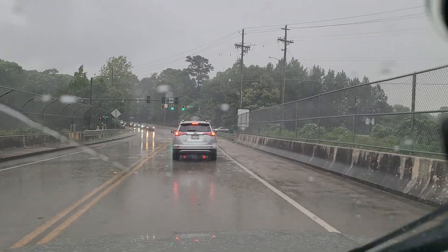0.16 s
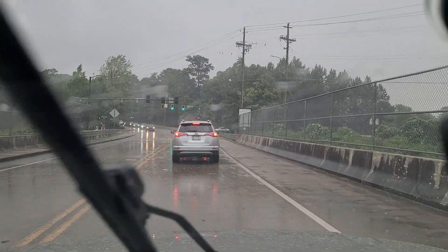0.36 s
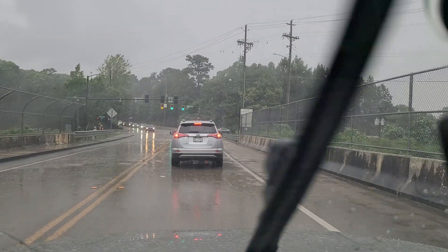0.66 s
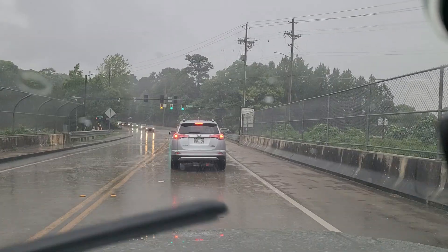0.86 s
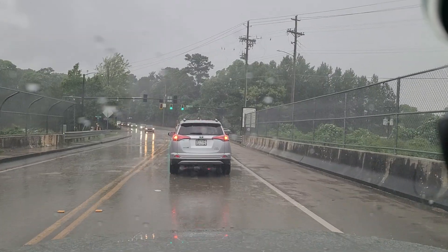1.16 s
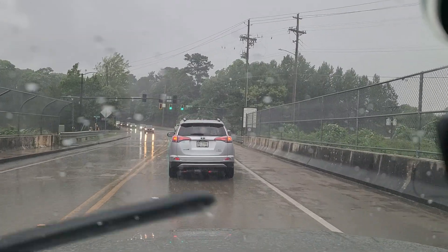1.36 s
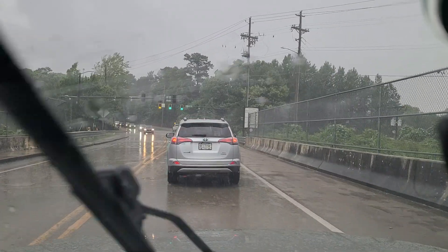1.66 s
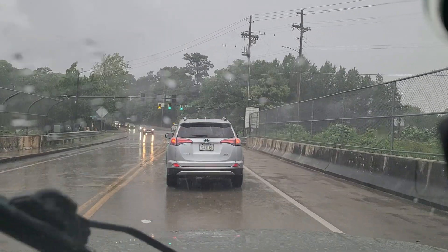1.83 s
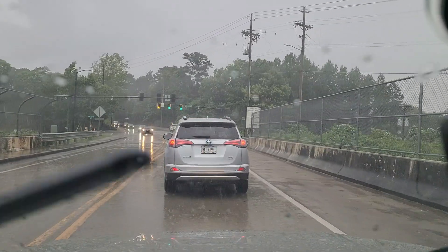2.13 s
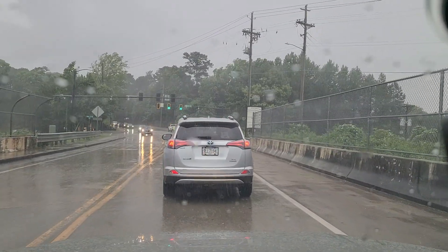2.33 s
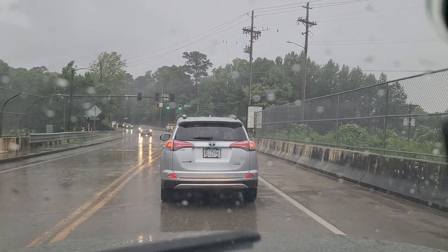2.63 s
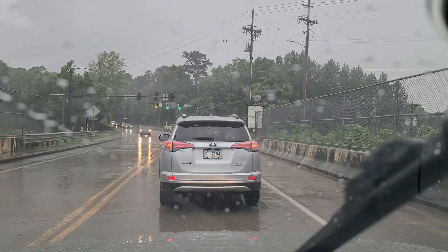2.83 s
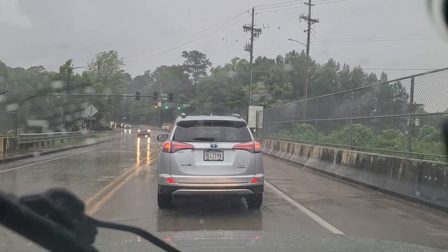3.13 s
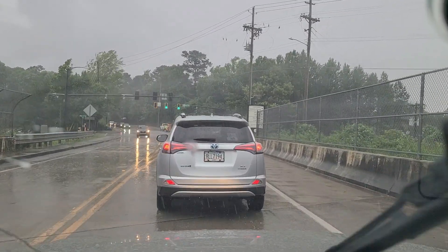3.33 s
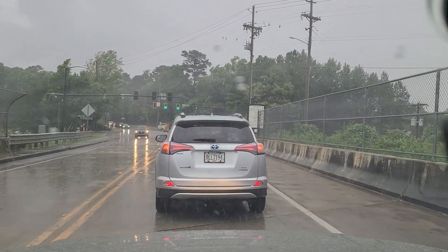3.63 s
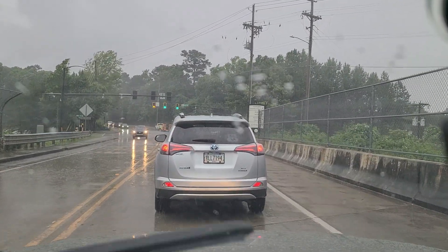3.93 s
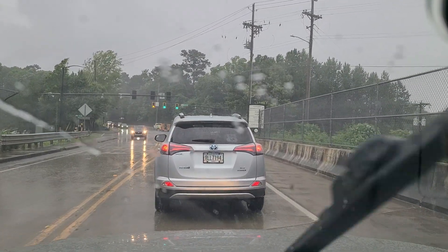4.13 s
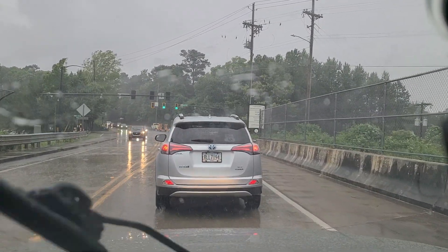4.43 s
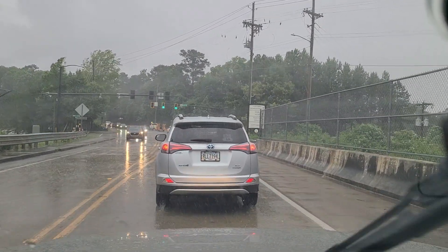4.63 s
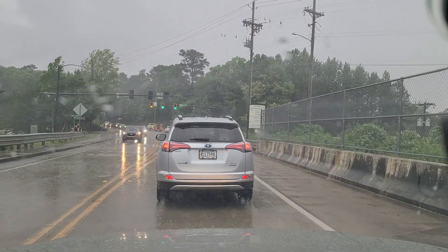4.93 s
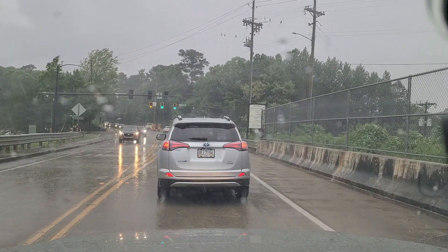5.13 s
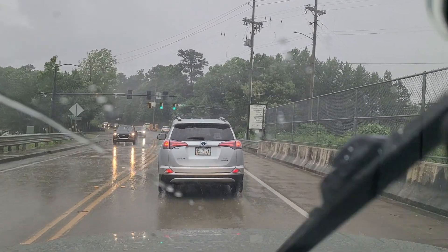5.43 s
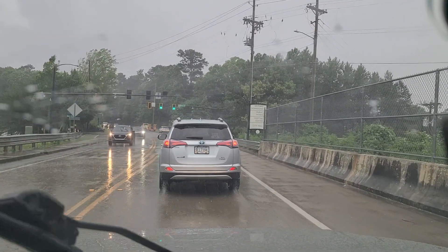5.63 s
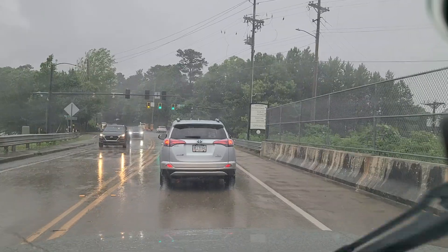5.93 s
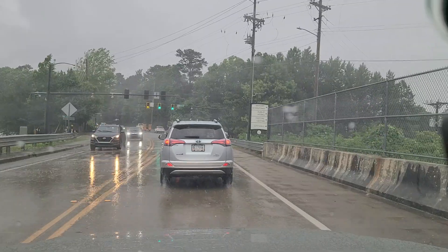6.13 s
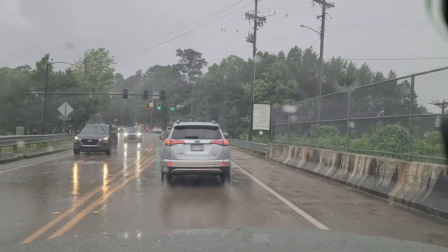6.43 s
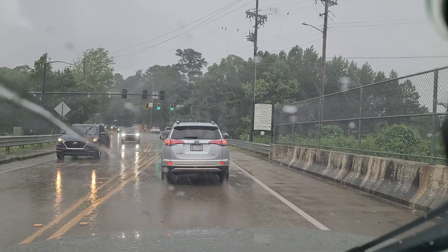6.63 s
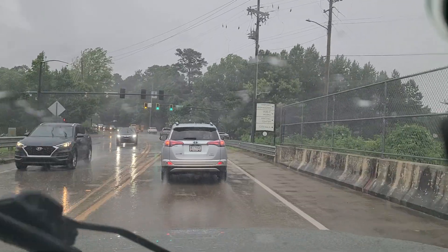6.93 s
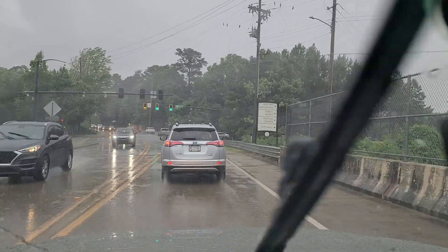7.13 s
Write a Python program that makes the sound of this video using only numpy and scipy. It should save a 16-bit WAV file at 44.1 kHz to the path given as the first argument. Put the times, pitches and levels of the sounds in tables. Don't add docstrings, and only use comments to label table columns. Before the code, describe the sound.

Rain patters over a car cabin while rubber wiper blades knock back and forth, small ticks sound, and a low engine hum rises near the end.

```python
import sys
import numpy as np
from scipy import signal
from scipy.fft import rfft, irfft, next_fast_len
from scipy.io import wavfile
from scipy.ndimage import uniform_filter1d

SR = 44100
rng = np.random.default_rng(int(sys.argv[2]) if len(sys.argv) > 2 else 0)


def transcribe(u):
    v = np.clip(np.atleast_2d(u).T, -1, 1)
    q = np.round(v * 32767).astype(np.int16)
    wavfile.write(sys.argv[1], SR, q)


def magnitude_from_level(level_db):
    exponent = np.asarray(level_db, float) / 20
    return 10 ** exponent


N = 321489
SIZE = next_fast_len(N + 4096)
BINS_HZ = np.maximum(np.arange(SIZE // 2 + 1) * SR / SIZE, 1)

# time_s, firing_hz, effort_db
ENGINE_RUN = [(0, 32.8, -24), (.8, 27.53, -42.5), (1.9, 25.37, -33.5), (2.75, 29.25, -44),
              (3.2, 32.17, -32.5), (3.4, 31.3, -36.5), (4.6, 25.93, -42.5), (5.15, 29.2, -40),
              (5.34, 31.85, -35.5), (5.48, 36.63, -19.5), (5.57, 45.6, -21), (5.72, 43.8, -18.5),
              (5.95, 44.65, -20), (6.13, 50.06, -19.5), (6.19, 51.72, -23), (6.4, 55, -18.5),
              (6.62, 61, -19), (7.0, 66.5, -16)]
# multiple, level_db
FIRING_HARMONICS = [
    (1, -1),
    (2, -8),
    (3, -16.5),
    (4, -24.5),
]
# pitch_hz, gain_db
CABIN_TRANSFER = [(44, 8), (50, 1.5), (52, -9), (62, -16.5), (88, 2), (112, -28.5), (133, -5.5), (160, -1),
                  (195, -2), (228, -3), (250, 11.5), (260, -10)]
# time_s, level_db
TYRE_ROAR = [(0, -29), (.8, -33), (1.6, -33), (2.6, -35.5), (3.6, -37), (4.6, -38), (5.2, -36.5),
             (6.2, -31), (6.7, -31.5), (7.29, -31.5)]
# peak_s, seat_boom_db, floor_boom_db
ROAD_BUMPS = [(0.039, -25, -12.5), (0.088, -15, -16.5), (.29, -36, -20), (.41, -20.5, -38),
              (0.509, -16, -16.5), (.62, -21, -31), (.72, -21, -25), (.93, -35, -22), (1.052, -24, -40),
              (1.118, -38, -15.5), (1.35, -23, -21), (1.6, -41, -22), (1.94, -42, -25), (2.09, -32, -26),
              (2.47, -29, -21), (2.55, -29, -43), (2.71, -22.5, -39), (2.84, -42, -23), (3.19, -41, -28.5),
              (3.48, -23, -39.5), (3.82, -42, -21.5), (4.36, -43, -25.5), (4.54, -43, -26.5),
              (4.68, -30, -27.5), (5.05, -38, -30.5), (6.7, -47, -23), (7.2, -18, -41)]
# pitch_hz, density_db_per_hz
SEAT_SPECTRUM = [(20, 5), (30, 21), (37, 22.5), (48, 9), (62, 9.5)]
# pitch_hz, density_db_per_hz
FLOOR_SPECTRUM = [(52, 0.5), (59, -7), (67, -2.5), (77, 8), (83, 10), (89, -23), (98, -6), (112, -15.5)]

# time_s, downpour_db, spray_db
RAINFALL = [(0, 2.5, 4.5), (.3, 3.5, 4.5), (.75, 3, 2.5), (.97, 0, 2.5), (1.32, -1, 1.5), (1.76, 2.5, 2),
            (2.31, 2, 0.5), (2.84, -2, -5), (3.1, -1.5, -7.5), (3.53, -4.5, 0), (3.72, -5, 0),
            (3.98, 0, -2), (4.5, -3, -5.5), (4.65, 1.2, -3), (5.1, -2, -5), (5.9, -2, -2.5), (6.6, 2, 1),
            (7.25, 3.5, 5.5)]
# pitch_hz, density_db_per_hz
ROOF_DRUMMING = [(360, -3.5), (620, 1), (654, -5), (749, -5), (1150, -2), (1200, 2), (1260, -2),
                 (1480, -7.5), (1950, -8.5), (2960, -14.5), (3800, -36.5), (4940, -48), (8360, -120)]
# pitch_hz, density_db_per_hz
GLASS_PATTER = [(1880, -13), (3200, -1.5), (3770, -8), (5120, -13.5), (7300, -14.5), (8090, -20.5),
                (8800, -35.5), (11400, -57), (19400, -120)]
# pitch_hz, density_db_per_hz
SPRAY_FIZZ = [(5470, -40), (8700, -7.5), (9500, 0), (10100, 2), (12300, 0.5), (13700, -1.5), (15600, -11)]
# peak_s, level_db
MIST_PUFFS = [(.3, -74), (.75, -68), (2.171, -69), (2.69, -76), (3.37, -77), (3.51, -65), (3.78, -72),
              (4.63, -73), (7.15, -69)]
# pitch_hz, shared_fraction
EAR_LIKENESS = [(30, 1), (80, .97), (130, 0.78), (290, 0.83), (600, 0.21), (1200, 0.29), (2400, 0.11),
                (5000, 0.096), (15000, 0.15)]
# pitch_hz, left_minus_right_db
EAR_BALANCE = [(60, 1.5), (110, -3.5), (200, 0.5), (380, -3.5), (700, -1.5), (1290, -1), (2380, -1.5),
               (4400, -4), (8120, 1), (15000, -8.5)]

# pitch_hz, density_db_per_hz
DASH_SPECTRUM = [(59, -33), (100, 6.5), (113, 0), (140, 3.5), (199, -5), (240, -9.5), (310, -14.5),
                 (530, -120)]
# pitch_hz, density_db_per_hz
ROOF_SPECTRUM = [(215, -16.5), (240, -2.5), (257, 0.5), (275, -5), (310, -31)]
# pitch_hz, density_db_per_hz
WET_SCREEN_SPECTRUM = [(160, -14), (270, 0.5), (376, -4), (567, -7), (650, -26), (720, -5), (940, -29),
                       (1580, -120)]
# turn_s, dash_knock_db, roof_hum_db
BOTTOM_TURNS = [(1.153, -21.5, -30.5), (2.455, -23, -36.5), (3.75, -23, -32), (5.043, -21.5, -34),
                (6.335, -23, -33.5)]
# turn_s, dash_knock_db, roof_hum_db
TOP_TURNS = [(.52, -25, -37.5), (1.83, -27, -33), (3.11, -27.5, -33.5), (4.4, -26.5, -28.5),
             (5.67, -26.5, -34.5), (6.98, -26.5, -45)]

# start_s, peak_db, thump_over_peak_db, judder_t60_s
BLADE_FLIPS = [(0.439, -11.5, -15, 0.34), (0.499, -27, -2, 0.17), (1.145, -46, 5, 0.3),
               (1.209, -38, 3, 0.43), (1.266, -23, 0.1, 0.25), (1.723, -20, -11, 0.38),
               (1.775, -17.5, 4, 0.15), (1.835, -13.5, -9, 0.064), (2.443, -28, -9, 0.38),
               (2.589, -19.5, -12, 0.27), (2.667, -14.5, -3, 0.19), (3.008, -18.5, -21, 0.55),
               (3.043, -30, -7, 0.37), (3.101, -16.5, -12, 0.24), (3.737, -24.5, -1, 0.7),
               (3.877, -21.5, -2, 0.26), (4.165, -22.5, -4, 0.73), (4.212, -19.5, -8, 0.45),
               (4.275, -18, -11, 0.21), (4.322, -16.5, -14, 0.27), (4.346, -14.5, -20, 0.31),
               (4.376, -19, -8, 0.25), (4.397, -36, -1, 0.31), (5.023, -27, 8, 0.55),
               (5.239, -22, -4, 0.39), (5.493, -13, -19, 0.41), (5.59, -15, -7, 0.51),
               (5.68, -10, -7, 0.082), (6.89, -24, -3, 0.33), (6.934, -21, -5, 0.27)]
# pitch_hz, level_db, t60_s
GLASS_MODES = [(350, 14, 0.063), (407, 4.5, 0.055), (535, -17, 0.017), (567, -8, 0.1), (1330, -11, 0.039)]
# pitch_hz, level_db, t60_s
BULKHEAD_MODES = [(127, -13, .1), (166, -16, 0.06)]
# pitch_hz, density_db_per_hz
JUDDER_SPECTRUM = [(120, 5.5), (200, -20), (258, -10.5), (329, 4), (403, -3.5), (443, -4), (555, 0),
                   (668, -23.5), (800, -14), (1040, -58), (1760, -120)]
# start_s, peak_db, pitch_hz
EDGE_SNAPS = [(.4425, -16, 380), (.467, -21, 360), (.491, -20, 420), (.504, -20, 500), (.519, -20, 520),
              (.581, -20, 230), (1.521, -28, 330), (1.571, -28, 540), (1.838, -17, 280), (2.32, -27, 400),
              (1.146, -17, 130), (1.203, -24, 420), (1.273, -20, 330), (1.298, -23, 240),
              (1.7245, -20, 330), (1.782, -17, 250), (1.794, -20, 330), (1.818, -17, 190), (2.45, -16, 130),
              (2.452, -20, 330), (2.519, -21, 520), (2.5885, -17.5, 500), (2.669, -19, 430),
              (2.75, -21, 280), (3.009, -12.5, 440), (3.025, -21, 520), (3.045, -20, 330), (3.1, -17, 340),
              (3.17, -18, 170), (3.615, -23, 260), (3.737, -15, 150), (3.765, -18, 140),
              (4.212, -15.5, 340), (4.278, -22, 450), (4.3205, -12, 400), (4.347, -18, 400),
              (4.377, -15, 420), (4.396, -18, 190), (4.416, -20, 240), (4.431, -18, 220), (4.455, -23, 200),
              (4.025, -26, 540), (4.665, -26, 260), (4.743, -28, 390), (4.89, -20, 150), (5.033, -19, 170),
              (5.014, -26, 310), (5.458, -26, 500), (5.496, -13.5, 385), (5.513, -19, 500),
              (5.592, -16, 370), (5.684, -21, 380), (6.062, -26, 250), (6.233, -27, 350), (6.516, -24, 245),
              (6.903, -21, 350), (6.926, -14, 370), (6.954, -14, 415), (6.975, -20, 330), (7.04, -22, 250)]
# start_s, length_s, squeal_hz, width_hz, level_db
RUBBER_SCUFFS = [(2.575, .04, 1200, 500, -45), (3.075, .04, 2100, 900, -50), (3.084, .026, 4200, 500, -56),
                 (3.115, .024, 2500, 1200, -44), (3.712, .014, 3500, 2500, -51),
                 (4.21, .012, 1200, 300, -43), (4.226, .018, 1230, 250, -41), (4.32, .014, 1250, 400, -44),
                 (.487, .014, 1230, 300, -42), (1.79, .02, 1250, 500, -44), (4.203, .022, 2620, 1200, -48),
                 (4.368, .016, 3600, 2500, -48), (4.388, .018, 1250, 500, -39),
                 (4.385, .03, 3000, 2000, -48), (4.392, .04, 6000, 3000, -58), (4.6, .04, 2500, 3500, -46),
                 (5.657, .014, 4730, 200, -45), (5.67, .012, 4800, 300, -51), (5.655, .03, 3000, 2500, -48),
                 (5.68, .012, 3600, 2500, -43), (5.651, .035, 1200, 500, -40),
                 (6.93, .055, 2540, 2000, -47)]

# start_s, peak_db, treble_over_peak_db, t60_s
SWITCH_TICKS = [(0.617, -40.5, -21, 0.05), (0.782, -37, -30, 0.054), (1.2418, -36, -30, 0.12),
                (1.5483, -46, -17, 0.046), (1.7917, -38, -36, 0.063), (1.915, -38.5, -21, 0.067),
                (2.066, -53.5, -14, 0.05), (2.0794, -52, -15, 0.05), (2.1225, -51, -13, .04),
                (2.2776, -50, -16, 0.05), (2.544, -31, -27, 0.035), (2.6194, -50, -23.5, 0.038),
                (2.6903, -42.5, -26, 0.042), (2.808, -42, -20.5, 0.052), (3.2128, -36, -24.5, 0.058),
                (3.838, -33.5, -27, 0.048), (4.392, -42, -30, 0.046), (4.507, -36.5, -20, 0.048),
                (4.601, -55, -15.5, .1), (4.627, -50, -18, 0.039), (5.0144, -41.5, -38, 0.074),
                (5.1303, -31.5, -27, 0.043), (5.219, -49.5, -27.5, 0.05), (5.796, -36.5, -24, 0.069),
                (6.0855, -44, -23.5, 0.055), (6.4163, -34, -28, 0.061), (6.5984, -41.5, -24, 0.054),
                (7.077, -37.5, -23.5, 0.12)]
# pitch_hz, level_db, t60_s
PLASTIC_MODES = [(3710, 4.5, 0.02), (4860, -7, 0.012), (5610, -2, 0.021), (7120, -4, 0.032),
                 (7600, -10.5, .025)]
# pitch_hz, level_db, t60_s
PLASTIC_TREBLE_MODES = [(10050, -17.5, .003), (12000, 0, .004)]
# pitch_hz, gain_db
TICK_BODY = [(2000, -2.5), (3700, 4.5), (5500, -0.5), (7800, -5.0), (8800, -15)]
TICK_TREBLE = [(9200, -1.5), (11200, -3), (12000, 5.5), (12900, -1), (15800, -7.0)]

# peak_s, level_db
WATER_SPLASHES = [(2.1, -45), (4.62, -53), (5.25, -47.5), (5.36, -46)]
# pitch_hz, density_db_per_hz
SPLASH_SPECTRUM = [(1300, 2), (2200, -2.5), (3200, -4.5), (3800, -13.5), (7500, -17.5), (8500, -34)]
# start_s, peak_db, left_minus_right_db
TRIM_TAPS = [(5.5712, -36.5, -18), (5.5925, -39, -14), (5.613, -37, -10), (5.639, -39.5, -6.5),
             (5.659, -38.5, -4), (5.682, -35, -6), (5.7034, -38.5, -15), (5.7279, -40, -6),
             (5.7498, -36, -7), (5.817, -43.5, -2.5), (5.8424, -44, -7), (5.885, -40.5, -6),
             (5.9084, -43.5, -5), (5.9304, -41.5, -3), (5.9963, -41.5, -1.5), (6.0387, -43.5, -2)]
# pitch_hz, level_db, t60_s
TRIM_MODES = [(3800, 0.0, .004), (5000, 8.0, 0.0027), (6200, 1, .003), (7500, 1.5, 0.0043),
              (11500, -14.5, .003), (13500, -23, 0.0027)]
# pitch_hz, gain_db
TRIM_TO_EAR = [(2500, -7), (3500, 3.5), (8000, 0), (9000, -11), (10500, 3.5), (13000, 1), (15800, 1.5)]
# time_s, level_db
DRIVETRAIN_LOAD = [
    (6.1, -49),
    (6.3, -34.5),
    (6.599, -35),
    (6.85, -33),
    (7.0, -36.5),
    (7.29, -42),
]
# pitch_hz, density_db_per_hz
DRONE_SPECTRUM = [(150, -13.5), (180, -1.5), (215, -24), (252, -4.5), (285, -24), (340, -3.5), (400, -18),
                  (470, -29)]


def rms_one(x):
    return x / np.sqrt(np.mean(x ** 2) + 1e-20)


def in_time(rows):
    s, *columns = np.transpose(rows)
    return [np.interp(np.arange(N) / SR, s, column) for column in columns]


def at_hz(points):
    hz, value = np.transpose(points)
    return np.interp(np.log(BINS_HZ), np.log(hz), value)


def drift(rate_hz):
    hop = 40
    r = np.exp(-2 * np.pi * rate_hz * hop / SR)
    noise = rng.standard_normal(N // hop + 2002)
    slow = signal.lfilter([1], [1, -2 * r, r * r], noise)[2000:]
    return np.interp(np.arange(N) / hop, np.arange(len(slow)), rms_one(slow))


def sides(left_db):
    return magnitude_from_level(np.array([left_db, -left_db]) / 2)


def colour(x, spectrum):
    below, above = (spectrum[0][0] * .8, -150), (spectrum[-1][0] * 1.2, -150)
    gain = magnitude_from_level(at_hz([below] + list(spectrum) + [above]))
    return irfft(rfft(x, SIZE) * gain, SIZE)[..., :N]


def ring(clicks, modes):
    out = 0
    for hz, level_db, t60 in modes:
        r, w = magnitude_from_level(-60 / (t60 * SR)), 2 * np.pi * hz / SR
        poles = [1, -2 * r * np.cos(w), r * r]
        out = out + signal.lfilter([0, magnitude_from_level(level_db) * np.sin(w)], poles, clicks + 1e-18)
    return out


def shower(spectrum, per_s, spread_db, patchy_db, patch_hz):
    sizes = magnitude_from_level(spread_db * np.minimum(rng.exponential(1, (2, N)), 5)) * rng.choice([-1, 1], (2, N))
    drops = sizes * (rng.random((2, N)) < per_s / SR) * magnitude_from_level(patchy_db * drift(patch_hz))
    mid, side = rfft(colour(drops, spectrum), SIZE)
    alike = np.clip(at_hz(EAR_LIKENESS), 0, 1)
    ears = np.sqrt(1 + alike) * mid + np.sqrt(1 - alike) * side * [[1], [-1]]
    ears = ears * sides(at_hz(EAR_BALANCE))
    lag_s = 0.000449 * np.clip((BINS_HZ - 550) / 450, 0, 1)
    ears[1] *= np.exp(-2j * np.pi * BINS_HZ * lag_s)
    return rms_one(irfft(ears, SIZE)[:, :N])


def strikes(times, levels_db, pans_db):
    clicks = np.zeros((2, N))
    clicks[:, (np.array(times) * SR).astype(int)] = magnitude_from_level(levels_db) * sides(pans_db).reshape(2, -1)
    return clicks


def even(x, window_s):
    size = int(window_s * SR)
    power = uniform_filter1d(np.mean(x ** 2, axis=0), size)
    return x / np.sqrt(uniform_filter1d(power, size) + 0.0082)


def swell(times, levels_db, rise_db_s, fall_db_s):
    hop = 32
    age = np.arange(0, N + hop, hop) / SR - np.asarray(times)[:, None]
    level_db = np.asarray(levels_db)[:, None] + np.minimum(age * rise_db_s, -age * fall_db_s)
    power = magnitude_from_level(2 * level_db).sum(axis=0)
    return np.interp(np.arange(N) / hop, np.arange(len(power)), power)


def through_cabin(hz):
    at, db = np.transpose(CABIN_TRANSFER)
    return np.interp(np.log(hz), np.log(at), db)


def engine():
    hz, effort_db = in_time(ENGINE_RUN)
    phase = 2 * np.pi * np.cumsum(hz) / SR
    full_effort_db, harshness = -22.5, 0.19
    tone = 0
    for k, harmonic_db in FIRING_HARMONICS:
        level_db = effort_db + harmonic_db + through_cabin(k * hz) + 0.6 * k * drift(8.4)
        if k > 1:
            level_db = level_db + harshness * (effort_db - full_effort_db)
        tone = tone + magnitude_from_level(level_db) * np.sin(k * phase + rng.uniform(0, 2 * np.pi))
    return np.sqrt(2) * tone * sides(-.7)[:, None]


def road():
    roll_db, = in_time(TYRE_ROAR)
    hz, effort_db = in_time(ENGINE_RUN)
    s, seat_db, floor_db = np.transpose(ROAD_BUMPS)
    rise_db_s, fall_db_s = 289, 199
    shake_db = effort_db + through_cabin(hz) - 23
    seat = magnitude_from_level(2 * roll_db) + magnitude_from_level(2 * shake_db) + swell(s, seat_db, rise_db_s, fall_db_s)
    floor = magnitude_from_level(2 * (roll_db + 4)) + swell(s, floor_db, rise_db_s, fall_db_s)
    return (np.sqrt(seat) * even(shower(SEAT_SPECTRUM, 9500, 0.98, .3, 2.6), 0.096)
            + np.sqrt(floor) * even(shower(FLOOR_SPECTRUM, 8000, 0.31, 0.2, 3), 0.12))


def rain():
    rain_db, spray_db = in_time(RAINFALL)
    gust, flutter = drift(7.8), drift(27)
    mist = swell(*np.transpose(MIST_PUFFS), 120, 70)
    roof_db = -36 + rain_db + 0.51 * gust + 0.82 * flutter
    glass_db = -49.5 + 0.75 * rain_db + 0.56 * spray_db + 0.51 * gust + .6 * flutter
    fizz_db = -71 + spray_db + .7 * gust
    roof = magnitude_from_level(roof_db) * even(shower(ROOF_DRUMMING, 7000, 2.25, 0.67, 25), 0.35)
    glass = magnitude_from_level(glass_db) * even(shower(GLASS_PATTER, 14000, 3.64, 0.29, 25), .08)
    fizz = np.sqrt(magnitude_from_level(2 * fizz_db) + mist) * shower(SPRAY_FIZZ, 14000, 3.8, .5, 14)
    return roof + glass + fizz


def panels():
    rain_db, effort_db = in_time(RAINFALL)[0], in_time(ENGINE_RUN)[1]
    low_s, low_db, low_hum_db = np.transpose(BOTTOM_TURNS)
    high_s, high_db, high_hum_db = np.transpose(TOP_TURNS)
    swing_s = np.r_[low_s + 0.13, high_s]
    swing_slopes = 102.5, 104
    panel_rain_db = 0.15 * rain_db

    dash = swell(low_s, low_db, 507, 304)
    dash = dash + swell(swing_s, np.r_[low_db - 7, high_db], *swing_slopes)
    dash = dash + swell(low_s + 0.35, low_db - 15, 40, 40)
    dash = dash + magnitude_from_level(2 * (panel_rain_db - 35.5)) + magnitude_from_level(2 * (effort_db - 14.5))
    hum = swell(swing_s, np.r_[low_hum_db, high_hum_db], *swing_slopes)
    hum = hum + magnitude_from_level(2 * (panel_rain_db - 45.5)) + magnitude_from_level(2 * (effort_db - 20))
    screen = magnitude_from_level(2 * (rain_db - 39)) + magnitude_from_level(2 * (effort_db - 21.5))
    return (np.sqrt(dash) * even(shower(DASH_SPECTRUM, 1500, 2.04, 0.31, 4.2), 0.13)
            + np.sqrt(screen) * shower(WET_SCREEN_SPECTRUM, 1500, 2.2, 1.0, 7.3)
            + np.sqrt(hum) * even(shower(ROOF_SPECTRUM, 1500, 0.9, 0.28, 6.1), 0.25))


def wipers():
    s, db, low_db, t60 = np.transpose(BLADE_FLIPS)
    pan_db = np.full(len(s), -6.0)
    soft_contact = signal.butter(2, 900, fs=SR)
    knock = ring(signal.lfilter(*soft_contact, strikes(s + 0.004, db - 23, pan_db)), GLASS_MODES)
    age = np.arange(N) / SR - s[:, None]
    decay_db = 60 * np.maximum(age, 0) / np.clip(t60[:, None], .03, .8)
    onset = np.clip((age - .002) / 0.012, 0, 1)
    power = magnitude_from_level(2 * (db[:, None] - 8.5 - decay_db)) * onset
    judder = np.sqrt(power.sum(axis=0)) * even(shower(JUDDER_SPECTRUM, 3000, 1.4, 0.41, 15), 0.017)
    thump = ring(strikes(s, db + low_db - 16.0, pan_db / 3), BULKHEAD_MODES)
    return knock + judder + thump


def snaps():
    knocks = np.zeros((2, N))
    for s, db, hz in EDGE_SNAPS:
        t60 = 5.5 / hz
        knocks += ring(strikes([s], [db], -4.0), [(hz, 0, t60), (1.5 * hz, -6, t60 / 2)])
    return -signal.lfilter(*signal.butter(4, 690, fs=SR), knocks)


def scuffs():
    out = np.zeros((2, N))
    for s, length_s, hz, width_hz, db in RUBBER_SCUFFS:
        at, size = int(s * SR), int(length_s * SR)
        roughness = .5 + np.abs(rng.standard_normal(size))
        slips = rng.standard_normal((2, size)) * roughness
        edges_hz = [max(hz - width_hz / 2, 50), hz + width_hz / 2]
        band = signal.butter(3, edges_hz, "band", fs=SR, output="sos")
        squeal = rms_one(signal.sosfilt(band, slips)) * signal.windows.tukey(size, .6)
        out[:, at:at + size] += magnitude_from_level(db) * squeal * sides(1)[:, None]
    return out


def ticks():
    s, db, top_db, t60 = np.transpose(SWITCH_TICKS)
    pan_db = np.full(len(s), -4.0)
    size = 3000
    splash, top = np.zeros((2, 2, N + size))
    age = np.arange(size) / SR
    top_shape = np.minimum(age / 0.004, 1) ** 2 * magnitude_from_level(220 * age)
    for k, noise in enumerate(rng.standard_normal((len(s), 2, size))):
        burst = noise * magnitude_from_level(db[k] - 60 * age / np.clip(t60[k], .005, .1)) * sides(pan_db[k])[:, None]
        at = int(s[k] * SR)
        splash[:, at:at + size] += burst
        top[:, at:at + size] += burst * magnitude_from_level(top_db[k]) * top_shape
    body = ring(strikes(s, db - 11.5, pan_db), PLASTIC_MODES)
    body = body + magnitude_from_level(-1.5) * colour(splash[:, :N], TICK_BODY)
    treble = ring(strikes(s + .0025, db + top_db + 9.5, pan_db), PLASTIC_TREBLE_MODES)
    return body + treble + magnitude_from_level(13) * colour(top[:, :N], TICK_TREBLE)


def splashes():
    s, db = np.transpose(WATER_SPLASHES)
    return np.sqrt(swell(s, db, 150, 61)) * shower(SPLASH_SPECTRUM, 2500, 4.4, 1.1, 25)


def trim_buzz():
    s, db, pan_db = np.transpose(TRIM_TAPS)
    taps = ring(strikes(s + .001, db - 12.0, pan_db), TRIM_MODES)
    return colour(taps, TRIM_TO_EAR)


def pull_away():
    pull_db = np.interp(np.arange(N) / SR, *np.transpose(DRIVETRAIN_LOAD), left=-120)
    return magnitude_from_level(pull_db) * even(shower(DRONE_SPECTRUM, 1500, 2.8, .5, 9.6), 0.065)


def scene():
    weather_and_car = engine() + road() + rain() + panels()
    wiping = wipers() + snaps() + scuffs()
    return weather_and_car + wiping + ticks() + splashes() + trim_buzz() + pull_away()


def band_limit(x):
    return signal.sosfilt(signal.butter(12, 15830, fs=SR, output="sos"), x)


def record(dry):
    fade = np.minimum(np.arange(N) / 200, 1)
    hiss = magnitude_from_level(-84.5) * rng.standard_normal(dry.shape)
    return band_limit((dry + hiss) * fade)


dry = scene()
out = record(dry)
transcribe(out)
```